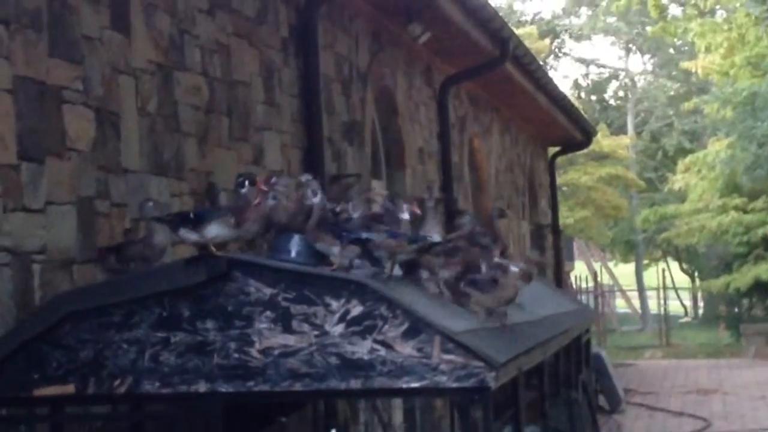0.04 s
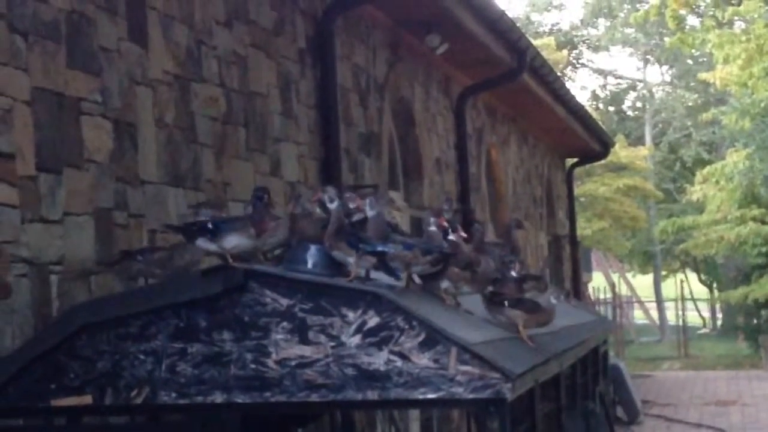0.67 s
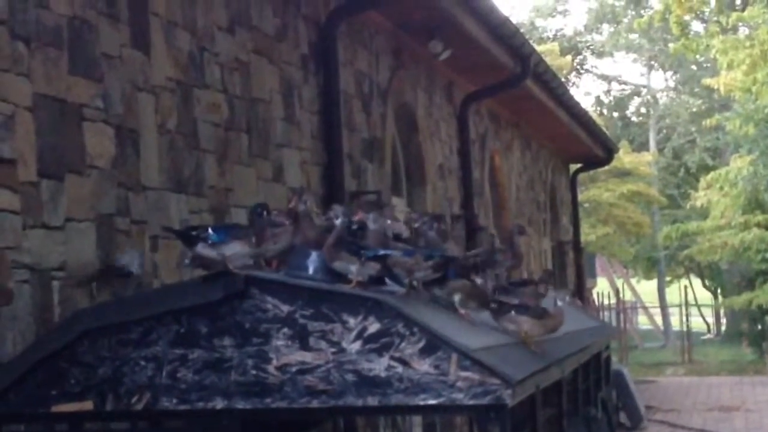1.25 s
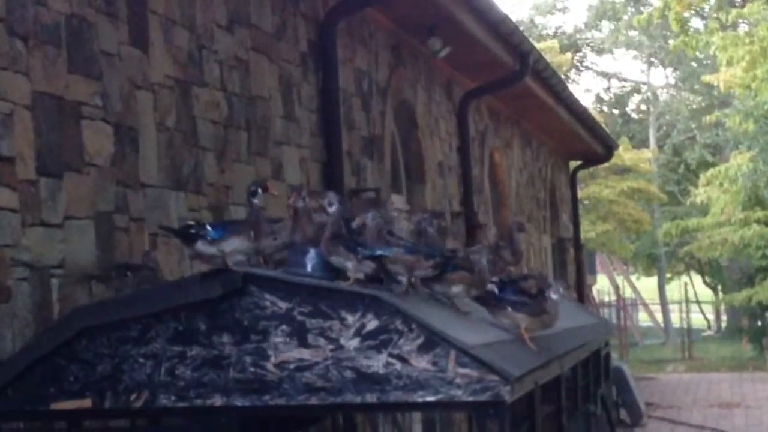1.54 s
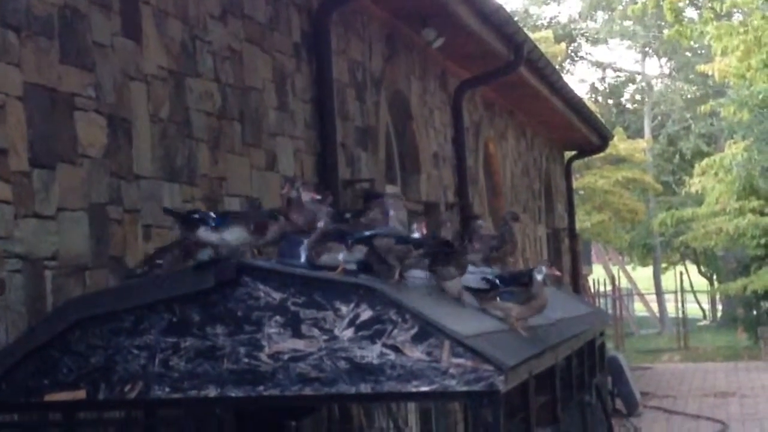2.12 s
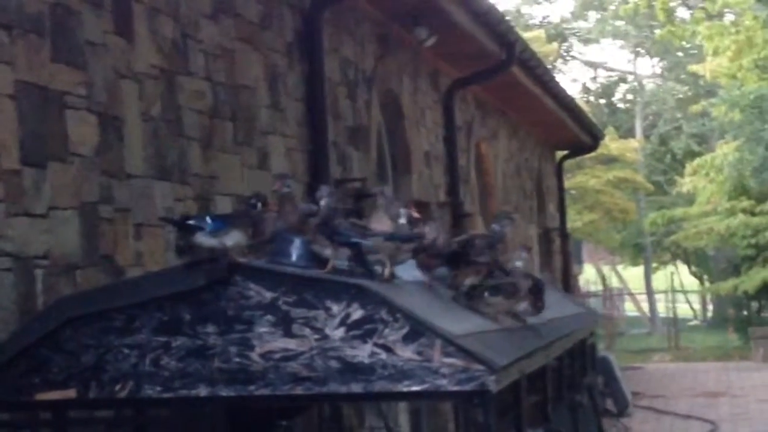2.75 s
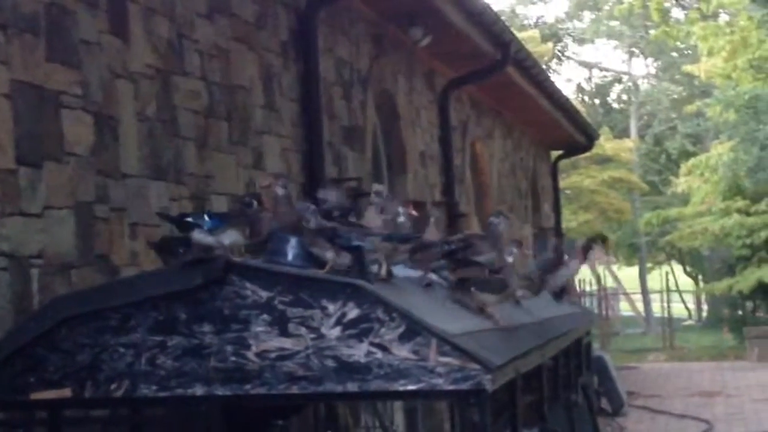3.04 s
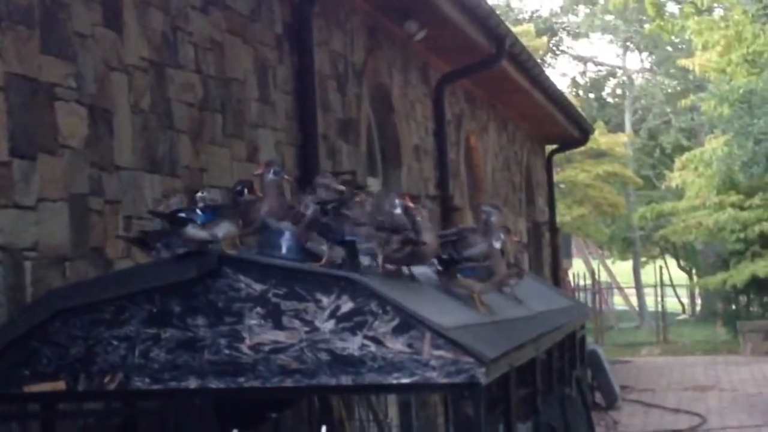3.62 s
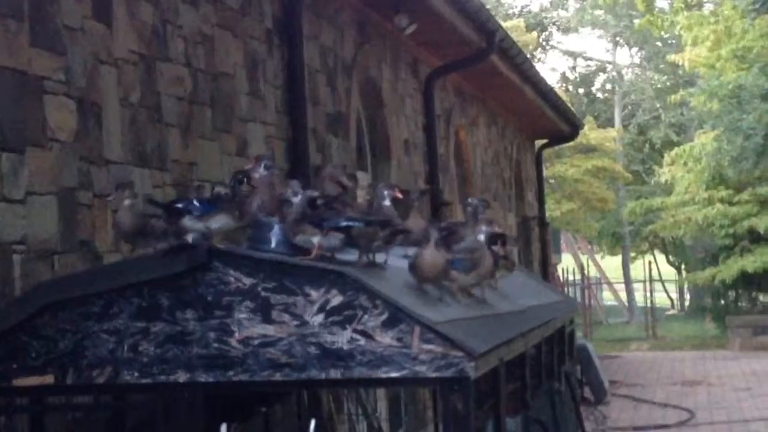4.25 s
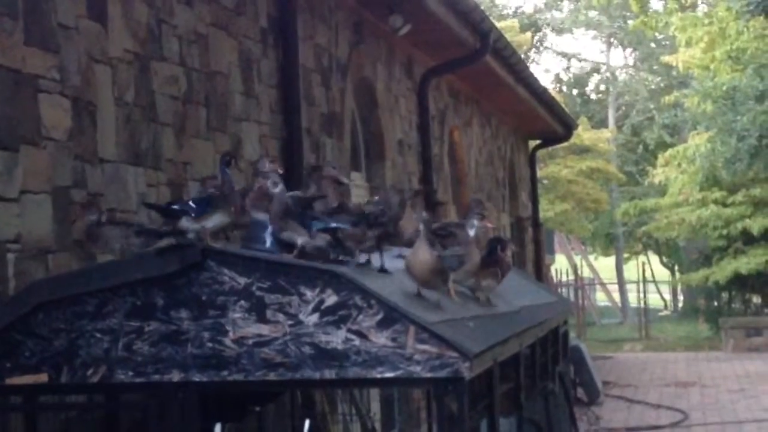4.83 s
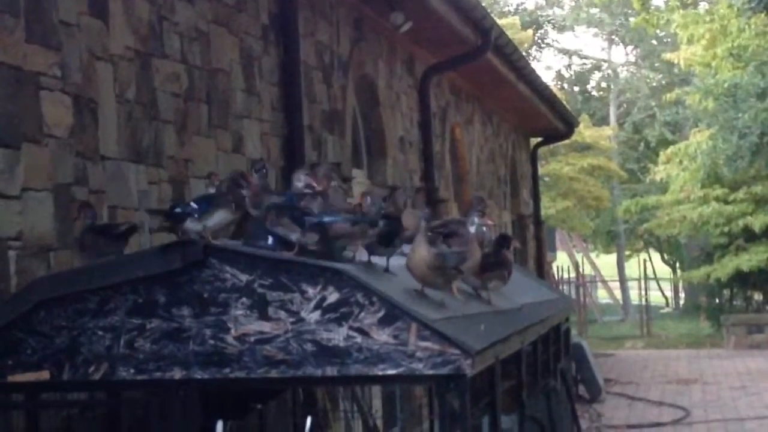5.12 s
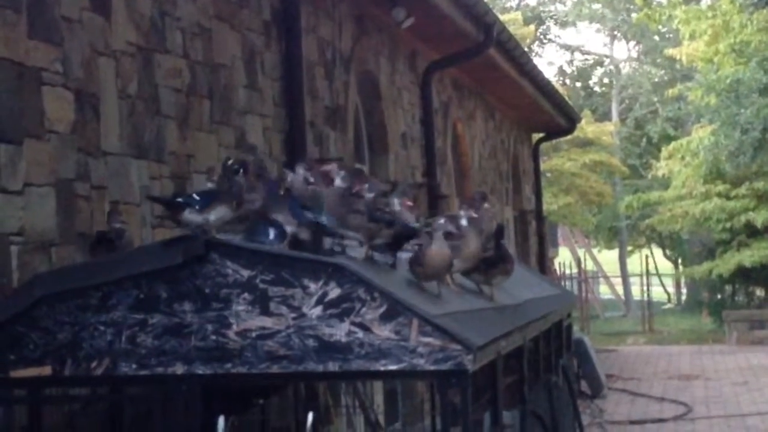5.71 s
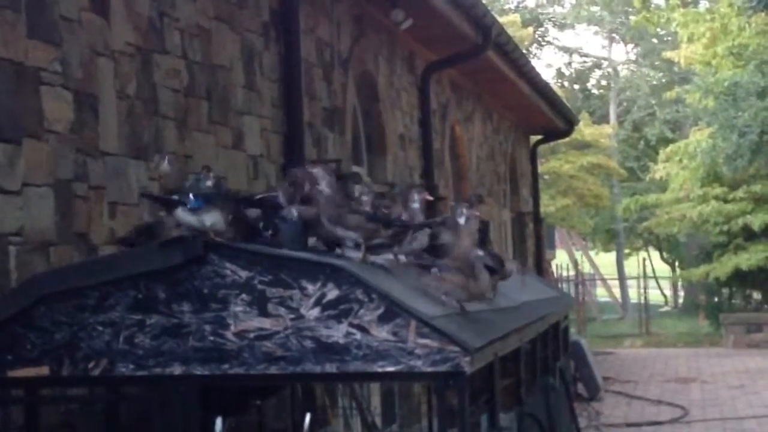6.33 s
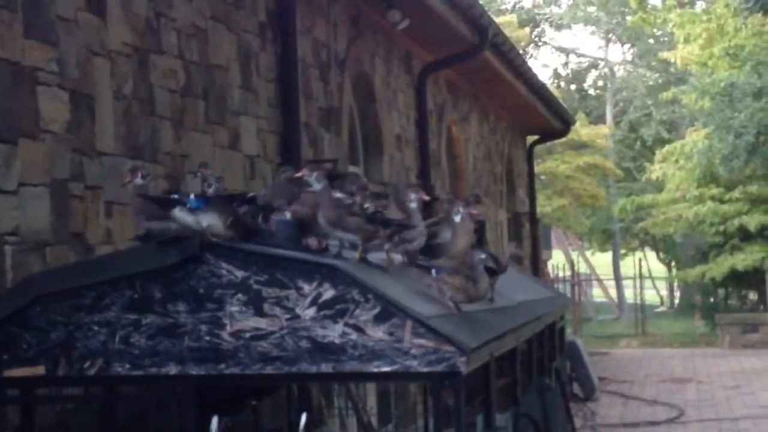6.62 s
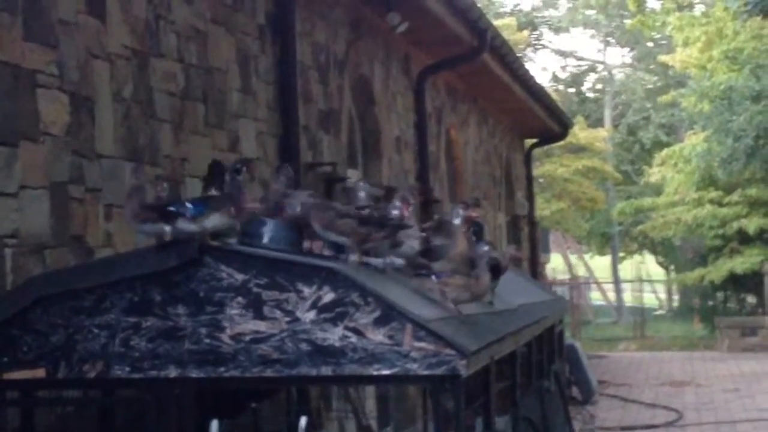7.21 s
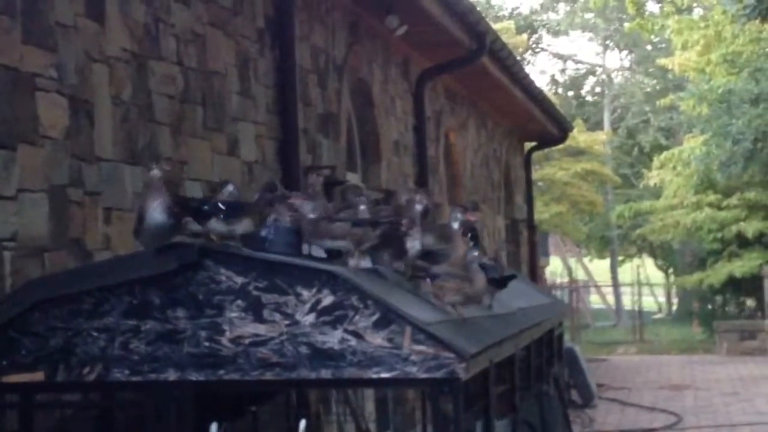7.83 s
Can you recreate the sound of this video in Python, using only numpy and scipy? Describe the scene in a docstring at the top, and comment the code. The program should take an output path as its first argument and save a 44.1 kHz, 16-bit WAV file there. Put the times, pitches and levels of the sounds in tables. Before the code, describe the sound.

A group of ducks jostles on a low shed roof outdoors, giving short raspy clucks over one another while their feet scuff, tap and thump. Soft peeps and a couple of thin rising squeals join in. Midway one duck flaps off with a few quick wingbeats and the clucking thins out, then it builds again with another squeal. The birds are fairly near, over faint outdoor noise.

```python
"""Ducks jostle on a low shed roof beside a stone wall, outdoors. From the start they cluck over one
another, syrinx pulses ringing throat and chest, while feet scuff and thump among short gritty taps.
Soft peeps join near 1 s, two squeals near 2 s. At 3.3 s one duck flaps down in six wingbeats; the
clucks thin out and a faint low rush follows. From 5 s they crowd in again, with a last squeal at 6.3 s."""
import sys
import numpy as np
from scipy import signal
from scipy.fft import rfft, irfft
from scipy.io import wavfile

SR = 44100
rng = np.random.default_rng(int(sys.argv[2]) if len(sys.argv) > 2 else 0)


def transcribe(signal):
    """Save signal, clipped to [-1, 1], as a 16-bit WAV file at the path in sys.argv[1]."""
    frames = np.atleast_2d(signal).T
    limited = np.clip(frames, -1, 1)
    pcm = np.round(limited * 32767).astype(np.int16)
    wavfile.write(sys.argv[1], SR, pcm)


N = 355887
TIME = np.arange(N) / SR


def from_db(db):
    """Decibels to gain."""
    return 10 ** (np.asarray(db) / 20)


def rms_one(x):
    """Scale to unit power."""
    return x / np.sqrt(np.mean(x ** 2) + 1e-20)


def in_time(rows):
    """Breakpoints joined by straight lines."""
    return np.interp(TIME, *np.transpose(rows))


def add(out, start_s, sound):
    """Mix a sound in at start_s."""
    i = round(start_s * SR)
    low, high = max(i, 0), min(i + len(sound), N)
    if high > low:
        out[low:high] += sound[low - i:high - i]


def drift(rate_hz, size=N):
    """Smooth random curve, spread about one."""
    steps = np.arange(size) * rate_hz / SR
    return np.interp(steps, np.arange(size // 8), rng.standard_normal(size // 8))


def grains(per_s, spread_db, size=N):
    """Random clicks of uneven strength, unit power."""
    born = rng.random(size) < per_s / SR
    clicks = born * rng.standard_normal(size)
    return rms_one(clicks * from_db(spread_db * np.minimum(rng.exponential(1, size), 4)))


def swell(t, rise_s, fall_s):
    """Envelope: steep onset, peak at t = 0, gentler decay."""
    return np.exp(-np.where(t < 0, (t / rise_s) ** 4, np.abs(t / fall_s) ** 1.92) / 2)


def shaped(x, envelope):
    """Apply an envelope, with unit power beneath it."""
    return x * envelope * np.sqrt(np.sum(envelope ** 2) / (np.sum((x * envelope) ** 2) + 1e-20))


def colour(x, spectrum):
    """Minimum-phase filter; white noise keeps its power."""
    size = 4096
    hz, db = np.transpose(spectrum)
    grid_hz = np.maximum(np.fft.rfftfreq(size, 1 / SR), 1)
    gain = rms_one(from_db(np.interp(np.log(grid_hz), np.log(hz), db)))
    cepstrum = irfft(np.log(gain))
    cepstrum[1:size // 2] *= 2
    cepstrum[size // 2 + 1:] = 0
    return signal.fftconvolve(x, irfft(np.exp(rfft(cepstrum))))[:len(x)]


def resonance(x, hz, share):
    """Steep-sided gliding resonance; share = width / centre."""
    carrier = np.exp(2j * np.pi * np.cumsum(np.broadcast_to(hz, x.shape)) / SR)
    width_hz = share * np.mean(hz)
    peak = signal.butter(1, width_hz / 2, fs=SR, output="sos")
    skirt = signal.butter(3, width_hz * 1.2, fs=SR, output="sos")
    return np.real(carrier * signal.sosfilt(np.vstack([peak, skirt]), x / carrier))


def scratch(db, hz, t60_s):
    """Band-passed grit: sharp start, exponential decay."""
    t = np.arange(SR // 3) / SR
    half_width_hz = .27 * hz
    middle_hz = np.hypot(hz, half_width_hz)
    edges_hz = [middle_hz - half_width_hz, min(middle_hz + half_width_hz, SR / 3)]
    band = signal.butter(1, edges_hz, "band", fs=SR, output="sos")
    grit = signal.sosfilt(band, grains(per_s=8300, spread_db=.5, size=len(t)))
    grit = signal.sosfilt(signal.butter(2, 8500, fs=SR, output="sos"), grit)
    return rms_one(grit) * from_db(db - 60 * t / t60_s)


# Outdoor noise spectrum: f/Hz, relative level/dB
YARD_SPECTRUM = [(20, -35), (35, -20), (65, 2), (130, 6.5), (300, -0.5), (1000, -2.5), (3000, 0),
                 (8000, -15), (15500, -18.5)]
def yard(level_db=-55.5):
    """Steady, quiet outdoor noise."""
    return from_db(level_db) * colour(rng.standard_normal(N), YARD_SPECTRUM)


# Roof and wall reflections: delay/s, gain/dB
ECHOES = [(.0031, -22), (.0074, -17.5), (0.0117, -16), (.021, -19)]
def courtyard(x, t60_s=.11, tail_db=-12):
    """Direct sound, hard echoes and a short scattered tail."""
    t = np.arange(SR // 3) / SR
    tail = rng.standard_normal(len(t)) * from_db(-60 * t / t60_s) * (1 - np.exp(-t / .0013))
    response = tail * from_db(tail_db) / np.sqrt(np.sum(tail ** 2))
    for delay_s, db in ECHOES:
        response[round(delay_s * SR)] += from_db(db)
    return x + signal.fftconvolve(x, response)[:N]


# Muttering contour: t/s, relative level/dB
MUTTER_LEVEL = [(0,-34),(.74,-40),(1.03,-41.5),(1.3,-30),(1.6,-40.5),(2.31,-42.5),(2.76,-31.5),(3.15,-40),(3.3,-52),(3.95,-60),(4.16,-52),(5.05,-58),(5.17,-38),(5.4,-31),(6.65,-37.5),(6.92,-55),(7.28,-31.5),(8.07,-43)]
def mutter(gain_db=-8):
    """Ducks at the back: random pulses ring a wandering resonance."""
    pulses = grains(per_s=600, spread_db=1)
    voices = rms_one(resonance(pulses, hz=2000 * np.exp(.17 * drift(20)), share=.2))
    return voices * from_db(in_time(MUTTER_LEVEL) + gain_db + 2 * drift(45))


# Foot activity: t/s, relative level/dB
FOOT_LEVEL = [(0,-42.5),(.36,-49.5),(.65,-42),(.9,-49),(1.38,-48),(1.6,-50),(2.2,-48.5),(2.63,-48.5),(3.03,-49.5),(3.55,-50.5),(3.88,-58),(4.27,-51),(4.92,-55.5),(5.33,-48),(6.43,-44.5),(6.8,-49),(7.4,-45.5),(8.07,-48.5)]
# Scuff spectrum: f/Hz, relative level/dB
SCUFF_SPECTRUM = [(20, -47), (100, -6), (280, 3), (600, 5), (1000, 1.5), (2000, 11), (4000, 3),
                  (6200, -0.5), (8000, -10), (11000, -19.5), (15500, -43)]
def scuffing(gain_db=5.5):
    """Webbed feet rub the gritty roof without pause."""
    grit = colour(grains(per_s=5000, spread_db=1.5), SCUFF_SPECTRUM)
    return grit * from_db(in_time(FOOT_LEVEL) + gain_db + 2 * drift(60))


# Roof sheet modes: f/Hz, gain/dB, t60/s
ROOF_MODES = [(92.5, -14, 0.25), (185, -3.5, 0.086), (295.6, 4.5, 0.067), (458, 1, 0.15), (566, -3, 0.1),
              (710, 0.5, 0.1), (858, 4, 0.077)]
def roof(blows):
    """The sheet rings; each blow hits another spot and favours other modes."""
    out, struck = np.zeros(N), blows != 0
    for hz, db, t60_s in ROOF_MODES:
        radius, angle = from_db(-60 / (t60_s * SR)), 2 * np.pi * hz / SR
        drive = np.full(N, 1e-18)
        drive[struck] = blows[struck] * rng.uniform(-.96, 1, struck.sum())
        feedback = [1, -2 * radius * np.cos(angle), radius ** 2]
        out += from_db(db) * signal.lfilter([0, np.sin(angle)], feedback, drive)
    return out


# Heavy footfalls: t/s, drive level/dB
STOMPS = [(.789,-45),(2.548,-41),(3.282,-45),(3.795,-45),(4.239,-59)]
def footfalls(steps_per_s=16, gain_db=-9):
    """Soft random steps and a few heavy ones thump the roof."""
    steps = (rng.random(N) < steps_per_s / SR) * rng.random(N) ** 2
    stomps = np.zeros(N)
    for start_s, db in STOMPS:
        add(stomps, start_s, from_db([db]))
    return rms_one(roof(steps)) * from_db(gain_db + in_time(FOOT_LEVEL)) + roof(stomps)


# Taps, scrapes and wing claps: t/s, level/dB, centre f/Hz, t60/s
TAPS = [(.012,-36,4500,0.12),(0.206,-40.5,4470,.12),(0.426,-42.5,4470,0.27),(0.656,-42,3800,0.11),(.924,-44.5,4200,0.53),(1.232,-34.5,5430,0.055),(1.358,-36,3860,0.13),(1.709,-24,5900,0.011),(2.134,-38,4000,.08),(2.977,-46,6000,.058),(3.125,-28.5,3830,0.15),
        (3.20,-37,5900,.027),(3.33,-41.5,3200,0.18),(3.392,-40.5,7000,.04),(3.494,-36,4000,0.078),(3.792,-35.5,3000,0.15),(4.005,-36.5,3080,0.24),(4.055,-42,4000,0.32),(4.351,-27.5,2400,0.074),(4.538,-40,3400,0.16),
        (4.658,-37,2450,.1),(4.754,-29,2600,0.087),(4.807,-41.5,4000,.08),(5.728,-46,3000,.086),(7.325,-37.5,5000,0.07),(7.416,-36.5,4370,0.1),(7.655,-39,5030,0.046)]
def taps():
    """Short gritty taps and scrapes, including crisp wing claps during the take-off."""
    out = np.zeros(N)
    for start_s, db, hz, t60_s in TAPS:
        add(out, start_s, scratch(db, hz, t60_s))
    return out


# Spectrum of air moved by wings: f/Hz, relative level/dB
WING_AIR_SPECTRUM = [(20, -24), (40, 8), (70, 15.5), (110, 8), (170, 9), (500, 14), (900, 0), (3000, -36)]
def wings(takeoff_s=3.29, beats_per_s=10, puff_db=-40.5, loss_db_per_beat=4, rush_db=-55.5):
    """Each beat is a feather swish and a low puff of air; a faint rush follows the last."""
    feather_rise_s, puff_rise_s = .008, .0073
    feathers = np.zeros(N)
    air_gain = from_db(rush_db) * swell(TIME - 4.4, rise_s=.35, fall_s=.32)
    for beat in range(6):
        start_s = takeoff_s + beat / beats_per_s
        swish = scratch(db=-35, hz=3230, t60_s=.14)
        add(feathers, start_s, swish * (1 - np.exp(-TIME[:len(swish)] / feather_rise_s)))
        puff = swell(TIME - start_s - puff_rise_s, puff_rise_s, fall_s=.035)
        air_gain += from_db(puff_db - loss_db_per_beat * abs(beat - 1)) * puff   # second is strongest
    air = colour(rng.standard_normal(N), WING_AIR_SPECTRUM)
    return feathers + air * air_gain * from_db(2 * drift(23.9))


def whistles(calls, partials, waver, fade_share):
    """Thin gliding tones, hoarse with fast pitch and level flutter."""
    out = np.zeros(N)
    for start_s, length_s, first_hz, last_hz, db in calls:
        t = np.arange(0, length_s, 1 / SR)
        hz = first_hz + (last_hz - first_hz) * np.sin(np.pi / 2 * t / length_s) ** 2
        hz *= 1 + waver * drift(1201, size=SR)[:len(t)]
        phase = 2 * np.pi * np.cumsum(hz) / SR
        flutter = from_db(5 * drift(200, size=SR)[:len(t)])
        tone = sum(from_db(partial_db) * np.sin(k * phase) for k, partial_db in partials)
        add(out, start_s, rms_one(flutter * tone) * from_db(db) * signal.windows.tukey(len(t), fade_share))
    return out


# Peep calls: t/s, length/s, first f/Hz, last f/Hz, level/dB
PEEPS = [(.945,0.11,2890,2620,-40),(1.16,0.085,2750,3180,-41.5),(1.37,0.105,1290,1255,-42),(1.66,0.24,2755,2660,-45.5),
         (3.28,0.033,1600,1470,-49),(4.425,0.083,1280,1550,-44.5),(5.98,0.036,2460,2780,-35),(6.34,.048,2335,2870,-34.5),(6.915,.06,1280,1264,-44)]
def peeps():
    """Soft whistled calls of one partial."""
    return whistles(PEEPS, [(1, 0)], waver=.058, fade_share=.6)


# Squeal calls: t/s, length/s, first f/Hz, last f/Hz, level/dB
SQUEALS = [(1.90,0.13,1610,1980,-48),(2.0,.125,1780,2550,-47),(6.335,.14,1500,2320,-44)]
# Squeal harmonics: number, relative level/dB
SQUEAL_PARTIALS = [(1, -18), (2, -13), (3, -8.5), (4, -13), (5, -21)]
def squeals():
    """Rising calls rich in overtones."""
    return whistles(SQUEALS, SQUEAL_PARTIALS, waver=.027, fade_share=.4)


def syrinx(t, pitch_hz, jitter=.05, shimmer_db=1.5, weak_db=-12):
    """Uneven pulses, strong and weak in turn, creak an octave below pitch_hz."""
    count = 160
    pulse_s = np.cumsum(np.exp(jitter * rng.standard_normal(count))) / pitch_hz
    index = np.round((pulse_s - pulse_s[count // 2] - t[0]) * SR).astype(int)   # strong pulse at t = 0
    strength = from_db(weak_db * (np.arange(count) % 2) + shimmer_db * rng.standard_normal(count))
    inside = (index >= 0) & (index < len(t))
    return np.bincount(index[inside], strength[inside], len(t))


def hum(t, pitch_hz, octave_db=-4):
    """Low tone and its octave, sinking beneath a cluck."""
    fall_per_s = rng.uniform(0, 3.935)
    hz = pitch_hz * np.exp(-fall_per_s * np.clip(t, -.03, .03) + .022 * drift(162.4, size=len(t)))
    phase = 2 * np.pi * np.cumsum(hz) / SR
    return np.sin(phase) + from_db(octave_db) * np.sin(2 * phase)


# Chest response: f/Hz, relative level/dB
CHEST_SPECTRUM = [(30, -58), (130, -16), (200, 3), (420, 0.5), (600, 5), (780, 4), (950, -0.5),
                  (1200, -0.5), (1900, -22.5), (6000, -69)]
# Air rasp spectrum: f/Hz, relative level/dB
RASP_SPECTRUM = [(100, -53), (1500, -26), (2600, 10), (3600, 3.5), (5000, -3), (6300, -3.5), (8000, -8),
                 (11000, -22), (15500, -28)]
# Near clucks: t/s, length/s, throat level/dB, throat f/Hz, body reference level/dB, pitch f/Hz
CLUCKS = [(0.032,0.058,-37.5,2130,-49.5,289.4),(0.12,0.027,-27,2060,-51,284.5),(0.195,0.034,-32.5,2060,-43.5,281),(0.3,0.025,-32,1830,-43,379),(0.347,0.028,-30.5,2060,-46,307.7),
          (0.457,0.043,-27,1930,-38,369),(0.546,0.026,-31,2060,-44,313),(0.627,0.031,-28,1980,-48,299),(0.704,0.037,-31,2280,-52,367),
          (0.775,0.034,-29,1980,-44,262),(.83,.04,-39.5,1950,-49.5,285.5),(.926,0.026,-31.5,2020,-44.5,285.3),(1.043,0.043,-29,1880,-43,256),(1.236,0.026,-21.5,2040,-43,390),
          (1.268,0.074,-34.5,1850,-48,234.7),(1.369,0.077,-34,2020,-52,355),(1.53,0.073,-31,1960,-48,255.3),(1.737,0.058,-35.5,2160,-45.5,301),
          (1.902,0.025,-38.5,1850,-49,290.5),(2.045,0.067,-35,1950,-47.5,331),(2.267,.034,-30,1890,-41,284.5),(2.324,0.017,-36,1900,-43.5,237),
          (2.418,0.032,-35,1850,-41.5,291.4),(2.456,.028,-25,1970,-41,346.3),(2.564,0.038,-37,1570,-56,249),(2.619,0.03,-29,1850,-50,257.3),
          (2.676,.028,-31,1920,-51,302.6),(2.753,0.03,-31,1990,-43,315),(2.833,0.048,-26.5,2050,-42.5,342),(2.914,0.03,-34.5,1590,-50,246),
          (3.059,0.026,-32.5,2100,-47.5,265.4),(3.154,0.05,-35,1810,-49.5,248.4),(3.441,0.063,-41,2030,-55,355),(3.791,0.063,-40.5,2130,-58,323),(3.999,0.022,-32.5,2160,-49,294),
          (4.094,0.033,-29.5,1990,-51.5,279.7),(4.136,0.047,-38.5,1970,-54,244.3),(4.244,0.04,-43,2200,-43.5,334),(4.357,0.034,-39,1980,-47.5,305),(4.467,0.054,-42,1940,-52.5,242),
          (4.616,0.022,-41.5,1960,-47.5,312.6),(4.79,.04,-41,2000,-56.5,398),(4.882,0.016,-33.5,1980,-51.5,316.5),(4.93,0.057,-43,1830,-47.5,251.8),(5.004,0.041,-45.5,1430,-52.5,371),
          (5.101,.029,-34.5,2120,-50,331),(5.14,0.043,-26.5,2040,-44.5,289.6),(5.197,0.047,-31,1860,-48.5,284.3),(5.239,0.039,-30,2050,-41,368),
          (5.274,0.03,-27.5,1660,-42,284),(5.365,.025,-26.5,1960,-45,308),(5.467,.09,-27.5,2140,-43.5,354.3),(5.645,0.029,-30.5,1840,-44.5,325.4),
          (5.762,0.072,-26.5,2280,-45,350.6),(5.837,0.05,-34.5,2000,-49.5,361),(5.963,0.024,-24,1910,-41.5,266.4),(6.105,0.031,-39,2050,-51,277.6),
          (6.232,0.034,-29.5,1820,-45,291.5),(6.309,0.035,-40.5,1920,-59,387),(6.461,0.03,-21.5,2070,-39,319),(6.513,0.052,-35.5,1680,-53,292.4),(6.572,0.025,-22.5,1770,-41,297.7),
          (6.699,0.037,-30.5,1920,-45.5,299.5),(6.835,0.033,-22,1915,-46.5,359.7),(6.856,.034,-25.5,1670,-41,276.3),(7.033,0.041,-29,2180,-49,300),
          (7.151,0.04,-28,1620,-43,275),(7.268,0.057,-43,1930,-45.5,334),(7.469,0.03,-31.5,1950,-42,320.7),(7.521,0.041,-37,2200,-54,309),
          (7.682,0.085,-36,1790,-51.5,291.3),(7.753,0.04,-24.5,1950,-43,357.4),(7.892,0.026,-29,1900,-43,299.7),(7.983,0.031,-24,1940,-42,315.4),(8.042,0.032,-28.5,2070,-45,316.5)]
def clucks(rise_share=.44, throat_sag=.036, puff_s=.019, rasp_lead_s=.003, hum_lag_s=.00593):
    """Pulses ring a gliding throat and the chest; air rasps with each pulse; a hum lies beneath."""
    chest_db, rasp_db, windpipe_db = -1.5, 2.5, -4
    voice, chest, rasp = np.zeros((3, N))
    t = np.arange(-SR // 8, SR // 8) / SR
    for start_s, length_s, throat_db, centre_hz, body_db, pitch_hz in CLUCKS:
        rise_s, fall_s = rise_share * length_s, (1 - rise_share) * length_s
        envelope = swell(t, rise_s, fall_s)
        at_s = start_s + rise_s + t[0]
        pulses = syrinx(t, pitch_hz)
        puffs = signal.lfilter([1], [1, -np.exp(-1 / (puff_s * SR))], pulses)
        breath = (puffs + 2.7) * rng.standard_normal(len(t))
        throat_hz = centre_hz * (1 + throat_sag * np.interp(t, [-rise_s, fall_s], [1, -1]))
        # nearly shut bill: lower, narrower resonance
        throat = resonance(pulses + .008 * breath, throat_hz, share=centre_hz / 8800)
        add(voice, at_s, from_db(throat_db) * shaped(throat, envelope))
        buzz = rms_one(.32 * rms_one(pulses) + rms_one(breath))
        add(chest, at_s, from_db(body_db + chest_db) * shaped(buzz, envelope))
        windpipe = sum(resonance(buzz, ratio * rng.uniform(.92, 1.08) * throat_hz, share=.17)
                       for ratio in (2.4, 3.1))
        bright_buzz = buzz + from_db(windpipe_db) * rms_one(windpipe)
        add(rasp, at_s - rasp_lead_s, from_db(body_db + rasp_db) * shaped(bright_buzz, envelope))
        hum_db = body_db - 2.5 + .17 * (throat_db + 31.5)   # louder clucks hum more
        add(voice, at_s + hum_lag_s, from_db(hum_db) * shaped(hum(t, pitch_hz), envelope))
    return voice + colour(chest, CHEST_SPECTRUM) + colour(rasp, RASP_SPECTRUM)


def scene():
    """Calls, taps and feet with echoes; wingbeats and outdoor noise dry. Mono."""
    ducks = squeals() + peeps() + clucks() + taps() + mutter() + scuffing() + footfalls()
    return (from_db(-.04) * courtyard(ducks) + wings() + yard())[None]


def record(dry):
    """Steep low-pass at 15.5 kHz."""
    return signal.sosfilt(signal.ellip(10, .1, 80, 15500, fs=SR, output="sos"), dry)


dry = scene()
out = record(dry)
transcribe(out)
```